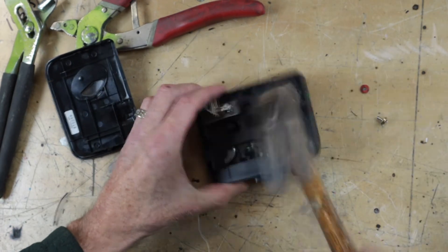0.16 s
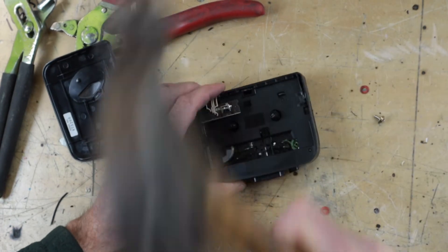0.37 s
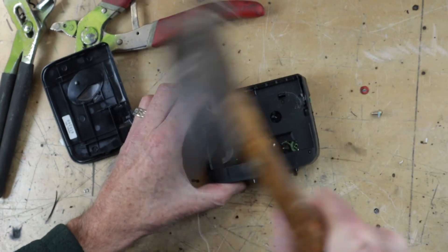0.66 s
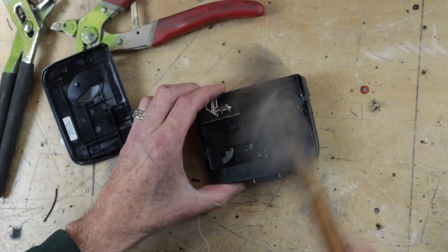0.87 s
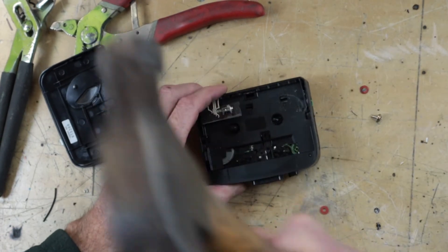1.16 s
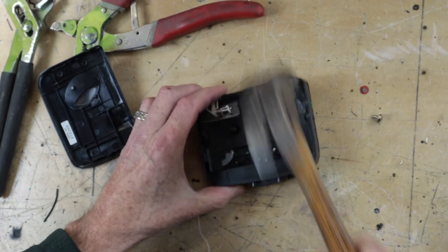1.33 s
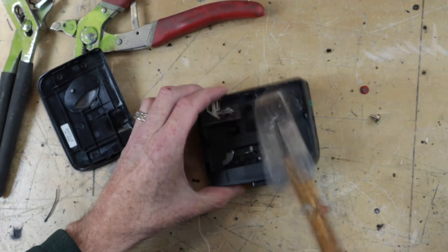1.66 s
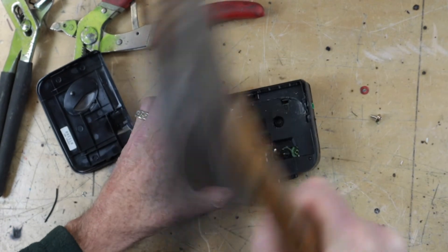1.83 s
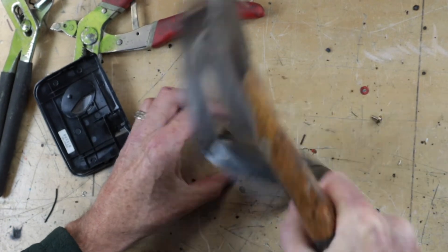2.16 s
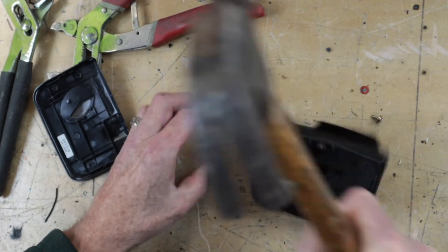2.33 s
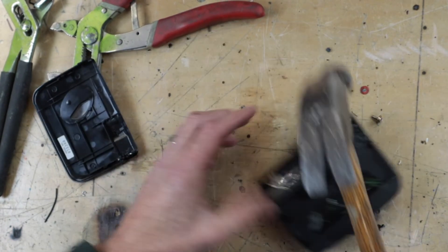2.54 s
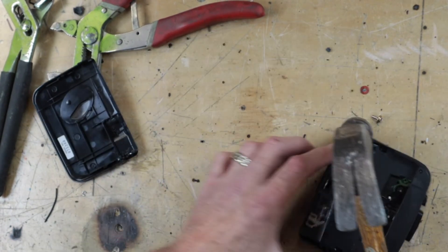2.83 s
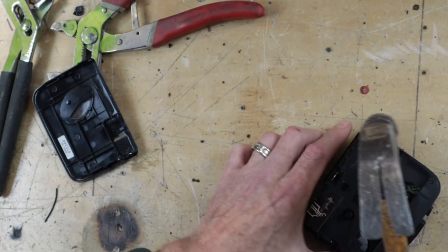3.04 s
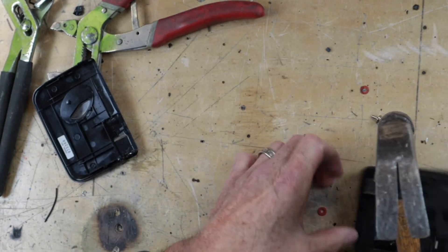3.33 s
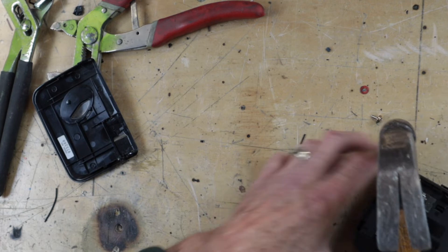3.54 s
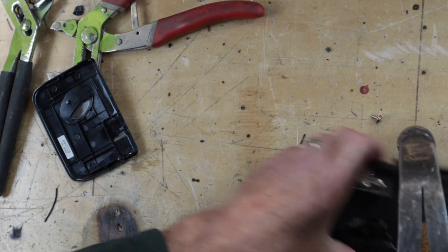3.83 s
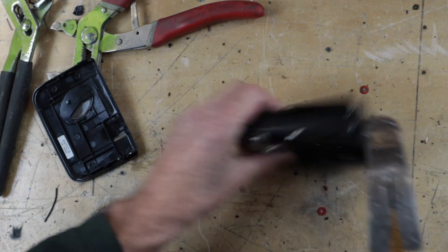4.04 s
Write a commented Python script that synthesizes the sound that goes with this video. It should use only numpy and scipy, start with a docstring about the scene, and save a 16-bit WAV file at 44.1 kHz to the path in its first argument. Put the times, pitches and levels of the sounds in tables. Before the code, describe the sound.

A claw hammer strikes a plastic case on a wooden workbench, heard close in a small workshop with a faint low hush. The tail of an earlier hit fades at the start. Six loud blows land evenly, at about 0.2, 0.6, 0.9, 1.3, 1.7 and 2.1 seconds. Each is a brittle crack and clack over a woody thump, slightly overloaded, with a short room ring. Faint plastic crackles fall between them, and there is a dull pop near 0.7 seconds. From 2.3 seconds the case skids and clatters on the bench, its light knocks thinning out by 2.9. Softer scraping and tapping begin around 3.1, with a tiny rising squeak at 3.2 and a brief jingle of loose parts near 3.4 to 3.5. From 3.7 to about 4.2 seconds the case is dragged back and lifted with a hollow scrape and a few small knocks.

```python
"""A claw hammer strikes a plastic case on a wooden workbench six times, close by, in a small workshop.
Each impact fractures the shell and excites the damped modes of panel and bench. It overloads a limiter,
and the reverberation swells as the gain recovers. An earlier blow is dying away at the start.
The case then skids and clatters, loose parts jingle, and a hand drags it back and picks it up:
friction gives the scrape and the squeak, brief contacts give the knocks."""
import sys
import numpy as np
from scipy import signal
from scipy.fft import rfft, irfft
from scipy.io import wavfile

SR = 44100
rng = np.random.default_rng(int(sys.argv[2]) if len(sys.argv) > 2 else 0)


def unload_audio(sound):
    """Save the sound as a 16-bit wav file, at the path given as the first command line argument."""
    columns = np.transpose(np.atleast_2d(sound))
    # keep every value between -1 and 1, then stretch to whole-number steps
    steps = np.round(np.clip(columns, -1, 1) * 32767)
    wavfile.write(sys.argv[1], SR, steps.astype(np.int16))


N = 184639
LEAD = round(0.25 * SR)   # samples before time zero, room for the earlier blow
TIME = np.arange(-LEAD, N) / SR
SIZE = len(TIME)
AGE = np.arange(SR) / SR   # seconds since an impact


def from_db(db):
    """Amplitude ratio of a level in decibels."""
    return 10 ** (np.asarray(db) / 20)


def unit_rms(x):
    """Normalisation to unit mean power."""
    return x / np.sqrt(np.mean(x ** 2) + 1e-20)


def at_hz(table, hz):
    """Interpolation along a logarithmic frequency axis."""
    frequencies, values = np.transpose(table)
    return np.interp(np.log(hz + 1e-9), np.log(frequencies), values)


def decay(t60_s):
    """One second of exponential damping, 60 dB down after t60_s."""
    return from_db(-60 * AGE / t60_s)


def add(track, start_s, sound):
    """Superposition of a sound on the track."""
    start = max(round(start_s * SR) + LEAD, 0)
    track[start:start + len(sound)] += sound[:len(track) - start]


def noise(spectrum, size=SIZE):
    """Spectrally shaped noise of unit rms, rolling off outside the table."""
    hz = np.fft.rfftfreq(size, 1 / SR) + 0.0013
    low_hz, high_hz = spectrum[0][0] / 2, spectrum[-1][0] * 2
    skirts = 1 / np.sqrt((1 + (low_hz / hz) ** 4) * (1 + (hz / high_hz) ** 4))
    white = rfft(rng.standard_normal(size))
    return unit_rms(irfft(white * from_db(at_hz(spectrum, hz)) * skirts, size))


def burst(spectrum, t60_s, hold_s=0):
    """Modal overlap: crowded modes merge into noise, driven for hold_s and then decaying freely."""
    size = SR // 5
    envelope = np.minimum(decay(t60_s)[:size] / from_db(-60 * hold_s / t60_s), 1)
    return noise(spectrum, size) * envelope


def ring(modes, scatter_db=0):
    """Free vibration: a sum of damped sines, their strengths scattered as by the point of impact."""
    return sum(from_db(db + scatter_db * rng.standard_normal())
               * np.sin(2 * np.pi * hz * AGE) * decay(t60_s) for hz, db, t60_s in modes)


def impact_envelope(impulses, t60_s):
    """Incoherent addition: the energies of small impacts sum and decay exponentially."""
    power = signal.lfilter([1], [1, -decay(t60_s)[1] ** 2], impulses ** 2 + 1e-18)
    return np.sqrt(power)


# Background spectrum: frequency_hz, density_db
HUSH_SPECTRUM = [(40, 5), (120, 2), (200, -4), (380, -2), (550, -15.5), (1900, -16.5), (3000, -19),
                 (7500, -25), (11000, -30), (16000, -33)]

def hush(level_db=-65.5):
    """Stationary ambient noise, strongest in the bass."""
    return from_db(level_db) * noise(HUSH_SPECTRUM)


# Reverberation strength: frequency_hz, gain_db
REVERB_GAIN = [(60, 2.5), (130, -2), (260, -12.5), (400, -11), (560, -3), (1200, -10), (3000, -11),
               (7500, -12.5), (11000, -17), (16000, -17)]
# Reverberation time: frequency_hz, t60_s
REVERB_TIME = [(60, 0.26), (300, 0.35), (1200, 0.46), (4000, 0.43), (8000, 0.34), (15000, .27)]

def reverberation(x, build_s=0.0016):
    """Diffuse field: the room stores each band's energy and returns it as decaying noise."""
    edges_hz = np.linspace(np.cbrt(50), np.cbrt(17000), 20) ** 3
    white = rng.standard_normal((2, len(x)))
    field = 0
    for k, (low, high) in enumerate(zip(edges_hz, edges_hz[1:])):
        hz = np.sqrt(low * high)
        bandpass = signal.butter(3, [low, high], "band", fs=SR, output="sos")
        band, diffuse = signal.sosfilt(bandpass, [x, white[k % 2]])
        energy = band ** 2
        build_pole = np.exp(-1 / (build_s * SR))
        decay_pole = decay(at_hz(REVERB_TIME, hz))[1] ** 2
        for pole in (build_pole, decay_pole):
            energy = signal.lfilter([1 - pole], [1, -pole], energy)
        field += from_db(at_hz(REVERB_GAIN, hz)) * np.sqrt(energy) * unit_rms(diffuse)
    return field


# Nearby wall and shelves: delay_s, gain_db
REFLECTIONS = [(.007, -18), (0.0103, -19.5), (0.0146, -18.5)]

def early_reflections(x):
    """Specular reflection: the nearest surfaces return delayed, weaker copies."""
    return sum(from_db(db) * np.pad(x, (round(delay_s * SR), 0))[:len(x)] for delay_s, db in REFLECTIONS)


# Resonance of the stand: frequency_hz, level_db, t60_s
STAND_MODES = [(33.7, -2, 0.71)]

def stand_shake(lag_s=0.023):
    """Structure-borne sound: each blow travels through the bench and rocks a camera stand."""
    out = np.zeros(SIZE)
    for start_s, _, _, _, shake_db, _, _ in HAMMER_BLOWS:
        add(out, start_s + lag_s, from_db(shake_db) * ring(STAND_MODES))
    return out


# Resonances of the pop: frequency_hz, level_db, t60_s
POP_MODES = [(250.7, -28.5, 0.013), (680, -2, 0.017), (1240, -11, .008), (1490, 4, 0.0084)]

def pop(start_s=0.7161, cutoff_hz=2300):
    """Heavily damped modes give one dull pop, too close to stir the room."""
    out = np.zeros(SIZE)
    lowpass = signal.butter(4, cutoff_hz, fs=SR, output="sos")
    add(out, start_s, -signal.sosfilt(lowpass, ring(POP_MODES)))
    return out


# Spectrum of the cracked edges: frequency_hz, density_db
EDGE_SPECTRUM = [(1000, -22), (3000, -2), (7000, 2), (12000, -8), (16000, -10.5)]

def creak(gain_db=-57, ticks_per_s=45, spread_db=4.5):
    """A Poisson process: until the last blow, the cracked shell crackles in the hand's grip."""
    gripped = TIME < HAMMER_BLOWS[-1][0]
    onsets = (rng.random(SIZE) < ticks_per_s / SR) * gripped
    strengths = from_db(spread_db * np.minimum(rng.exponential(1, SIZE), 3))
    return from_db(gain_db) * impact_envelope(onsets * strengths, t60_s=0.012) * noise(EDGE_SPECTRUM)


# Course of the squeak: time_s, pitch_hz, level_db
SQUEAK_PATH = [(3.216, 1676, -58), (3.227, 1847, -53), (3.242, 2166, -33.5), (3.252, 2120, -48),
               (3.268, 2010, -69)]

def squeak(jitter_hz=190):
    """Stick-slip motion: a corner of the case grips unevenly and gives a rough, rising chirp."""
    time_s, pitch_hz, level_db = np.transpose(SQUEAK_PATH)
    lowpass = signal.butter(2, jitter_hz, fs=SR, output="sos")
    jitter = signal.sosfilt(lowpass, rng.standard_normal((2, SIZE)))
    phase = 2 * np.pi * np.cumsum(np.interp(TIME, time_s, pitch_hz)) / SR
    chirp = unit_rms(jitter[0] * np.sin(phase) + jitter[1] * np.cos(phase))
    return from_db(np.interp(TIME, time_s, level_db, left=-140, right=-140)) * chirp


# Skids and drags of the case: start_s, length_s, scrape_db, body_db, slowing_db_per_s
SKIDS = [(2.253, 0.045, -47.5, -62, 60), (2.318, 0.11, -40, -40, 110), (2.435, 0.12, -40.5, -45.5, 51),
         (2.576, 0.31, -46, -54.5, 51), (3.137, .25, -44, -57.5, 79), (3.395, .19, -49, -55, 79),
         (3.665, 0.24, -51, -60, 20), (3.911, 0.09, -38.5, -43.5, 48), (3.997, 0.16, -46, -48.5, 61)]

def friction(attack_s=0.03, stop_db_per_s=134):
    """Sliding friction: scrape and body amplitudes follow the speed as the case starts, slows, stops."""
    amplitudes = 0
    for start_s, length_s, scrape_db, body_db, slowing_db_per_s in SKIDS:
        age = TIME - start_s
        slowing_db = slowing_db_per_s * np.maximum(age - attack_s, 0)
        stopping_db = stop_db_per_s * np.maximum(age - length_s, 0)
        speed = np.clip(age / attack_s, 0, 1) * from_db(-slowing_db - stopping_db)
        amplitudes += np.outer(from_db([scrape_db, body_db]), speed)
    return amplitudes


def rattle(taps_per_s=30, above_scrape_db=6):
    """Intermittent contact: the wobbling case taps its edges on the bench, harder at higher speed."""
    scrape, _ = friction()
    onsets = rng.random(SIZE) < taps_per_s / SR
    taps = onsets * from_db(rng.uniform(-2.8, 2, SIZE)) * scrape
    return from_db(above_scrape_db) * impact_envelope(taps, t60_s=0.014) * noise(EDGE_SPECTRUM)


# Spectra of the scraping rim and the rubbed hollow body: frequency_hz, density_db
RIM_SPECTRUM = [(300, -15), (900, -28), (1300, -8), (1900, 5.5), (2800, 1), (4400, 4.5), (7200, 4.5),
                (8600, 2), (10000, -8), (13000, -9), (15500, -26)]
RUB_SPECTRUM = [(45, 6), (110, -3.5), (175, 9), (280, -5), (520, -5), (800, 0), (1050, -1.5), (1500, -0.5),
                (3000, -15)]

def slide(catches_per_s=450):
    """Roughness noise: the rim catches on the wood at random, and each catch excites the hollow case."""
    scrape, body = friction()
    catches = (rng.random(SIZE) < catches_per_s / SR) * rng.rayleigh(1, SIZE)
    roughness = unit_rms(impact_envelope(catches, t60_s=0.045))
    return roughness * (scrape * noise(RIM_SPECTRUM) + body * noise(RUB_SPECTRUM))


# The case knocking on bench and hammer head: start_s, level_db, body_relative_db
CASE_KNOCKS = [(2.270, -18, -20), (2.314, -5, -11.5), (2.319, -12, -9), (2.335, -9.5, -8),
               (2.373, -12.5, -12), (2.442, -24, -15), (2.467, -20, -13.5), (2.477, -14.5, -15),
               (2.512, -22, -33), (2.59, -23.5, -11.5), (2.603, -19.5, -14.5), (2.653, -24.5, -23),
               (2.663, -21.5, -13), (2.702, -25.5, -18.5), (2.74, -29.5, -20), (2.797, -32, -28),
               (2.815, -30.5, -23), (2.844, -35, -32), (3.148, -36, -11), (3.166, -32, -14),
               (3.184, -26, -15), (3.286, -31.5, -18), (3.683, -30.5, -19), (3.694, -23.5, -21),
               (3.738, -35.5, -8.5), (3.88, -32.5, -8.5), (3.912, -26.5, -9), (3.951, -20.5, -23),
               (4.068, -33, -9), (4.083, -29, -25), (4.137, -25.5, -44), (4.164, -24.5, -40)]
# Ticks of the cracked shell and jingles of loose parts: start_s, level_db
EDGE_TICKS = [(0.131, -31), (0.475, -21.5), (0.696, -10), (0.7668, -7.5), (0.9072, -21), (1.238, -27.5),
              (1.997, -29)]
PART_JINGLES = [(3.402, -24), (3.41, -15.5), (3.443, -20), (3.4513, -20), (3.46, -26), (3.484, -21),
                (3.531, -28.5)]
# Spectra of the struck shell, hollow body and loose parts: frequency_hz, density_db
SHELL_SPECTRUM = [(1200, -67), (2600, 4.5), (3500, 6), (4600, 1.5), (6600, 7.5), (8200, 6), (9800, -9),
                  (12000, 0.5), (15500, -22)]
BODY_SPECTRUM = [(50, -28), (190, 4), (300, -6), (520, -10), (700, -5.5), (950, 6), (1400, 2.5),
                 (1900, 8.5), (2700, -0.5), (5000, -2)]
PART_SPECTRUM = [(1000, -21), (1900, -12), (2400, -14), (2900, -7.5), (4500, -15), (5500, -10), (6650, 5),
                 (7200, -4), (8000, -4.5), (9200, -11), (10200, -33), (15500, -30)]

def clatter(shell_gain_db=-8, body_gain_db=5, tick_gain_db=-8, jingle_gain_db=-7):
    """Impulse excitation: light contacts briefly ring the case, its cracked edges and loose parts."""
    out = np.zeros(SIZE)
    for start_s, level_db, body_relative_db in CASE_KNOCKS:
        body_db = level_db + body_relative_db
        add(out, start_s, from_db(level_db + shell_gain_db) * burst(SHELL_SPECTRUM, t60_s=0.03))
        add(out, start_s, from_db(body_db + body_gain_db) * burst(BODY_SPECTRUM, t60_s=0.02))
    for start_s, level_db in EDGE_TICKS:
        add(out, start_s, from_db(level_db + tick_gain_db) * burst(EDGE_SPECTRUM, t60_s=0.012))
    for start_s, level_db in PART_JINGLES:
        add(out, start_s, from_db(level_db + jingle_gain_db) * burst(PART_SPECTRUM, t60_s=0.026))
    return out


# Spectra of the fracture, midrange clack and bench frame: frequency_hz, density_db
CRACK_SPECTRUM = [(1000, -20), (2200, -7), (3300, -1), (4300, -5), (5500, -0.5), (8000, 1.5), (9800, -6),
                  (11500, -2.5), (15500, -15)]
CLACK_SPECTRUM = [(200, -10), (500, -4.5), (900, 1), (1600, 0.5), (2300, -8), (4000, -10.5)]
FRAME_SPECTRUM = [(55, -3), (80, -10), (165, -1), (260, -14.5), (500, -35.5)]
# Bench top: frequency_hz, level_db, t60_s
BENCH_MODES = [(116, -9, 0.61), (185.6, -9, .43), (265, 0, 0.33), (301, 26, 0.029), (326, -10.5, 0.64),
               (389.6, 12.5, 0.059), (432, 0, 0.06), (562, -14, 0.51), (627, -24.5, 0.33),
               (855, 7.5, 0.022)]
# Panel of the case: pitch_ratio, level_db, t60_s
PANEL_MODES = [(1.002, 2.5, 0.023), (2.249, 1, .018)]
# Blows: start_s, force_db, thump_db, midrange_db, shake_db, crack_t60_s, pitch_hz
HAMMER_BLOWS = [(-.19, 2, -11, -1.5, -17.5, 0.0065, 810), (0.186, -1.5, -5.5, 2.5, -5, 0.025, 910),
                (0.5568, 0.5, -10, 2, -9, 0.042, 1335), (0.9314, -5, -8, 1.5, -10.5, 0.017, 840),
                (1.3139, -7, -6.5, -1, -13.5, 0.0092, 1150), (1.6890, -8, -10.5, 6.5, -19, 0.038, 1500),
                (2.0538, -5.5, -20.5, -4.5, -30, 0.029, 1220)]

def hammer(crack_db=10, clack_db=5, frame_db=-9, fracture_s=0.003, bench_lag_s=0.002572):
    """Impact and brittle fracture: the shell cracks, its panel rings, then the bench takes the load."""
    out = np.zeros(SIZE)
    radiation = signal.butter(2, 150, "high", fs=SR, output="sos")   # a board radiates little bass
    for start_s, force_db, thump_db, midrange_db, _, crack_t60_s, pitch_hz in HAMMER_BLOWS:
        panel = ring([(pitch_hz * ratio, db, t60_s) for ratio, db, t60_s in PANEL_MODES])
        clack = from_db(clack_db) * burst(CLACK_SPECTRUM, t60_s=0.051)
        crack = from_db(crack_db) * burst(CRACK_SPECTRUM, crack_t60_s, hold_s=fracture_s)
        frame = from_db(frame_db) * burst(FRAME_SPECTRUM, t60_s=0.069)
        thump = -from_db(thump_db) * signal.sosfilt(radiation, ring(BENCH_MODES, scatter_db=1.5))
        add(out, start_s, from_db(force_db) * crack)
        for sound in (clack, panel):
            add(out, start_s + bench_lag_s / 2, from_db(force_db + midrange_db) * sound)
        for sound in (frame, thump):
            add(out, start_s + bench_lag_s, from_db(force_db) * sound)
    return out


def scene():
    """Superposition of direct sound, room response and hush with the stand's shake and the pop."""
    direct = hammer() + creak() + clatter() + slide() + rattle() + squeak()
    airborne = direct + early_reflections(direct) + reverberation(direct) + hush()
    return (airborne + stand_shake() + pop())[None, LEAD:]


def limiter(x, attack_s=0.0015, release_db_per_s=185):
    """Automatic gain control: the gain dives after a peak above full scale and climbs back steadily."""
    excess_db = np.maximum(20 * np.log10(np.abs(x[0]) + 1e-9), 0)
    climb_db = release_db_per_s * np.arange(N) / SR
    held_db = np.maximum.accumulate(excess_db + climb_db) - climb_db
    pole = np.exp(-1 / (attack_s * SR))
    return x * from_db(-signal.lfilter([1 - pole], [1, -pole], held_db))


def record(dry, ceiling=0.95, cutoff_hz=16000):
    """Overload: each blow's onset outruns the limiter and clips; a low-pass cuts the highest treble."""
    clipped = np.clip(limiter(dry), -ceiling, ceiling)
    lowpass = signal.ellip(10, 0.2, 80, cutoff_hz, fs=SR, output="sos")
    return signal.sosfilt(lowpass, clipped)


dry = scene()
out = record(dry)
unload_audio(out)
```